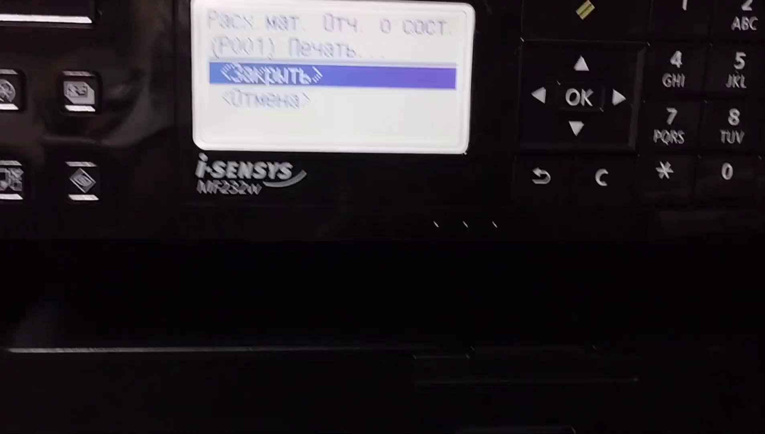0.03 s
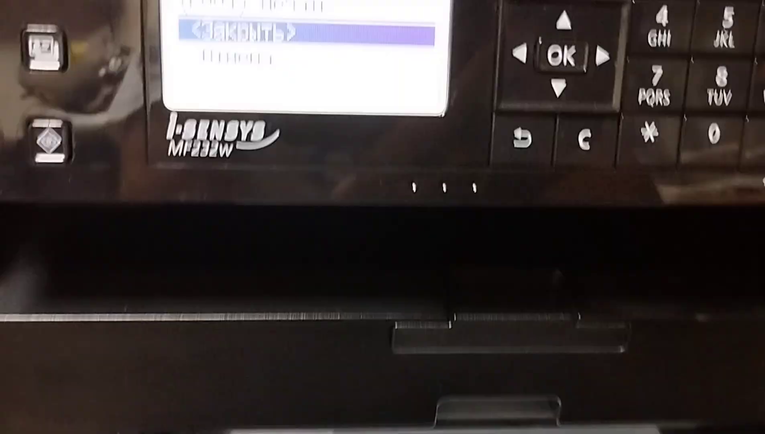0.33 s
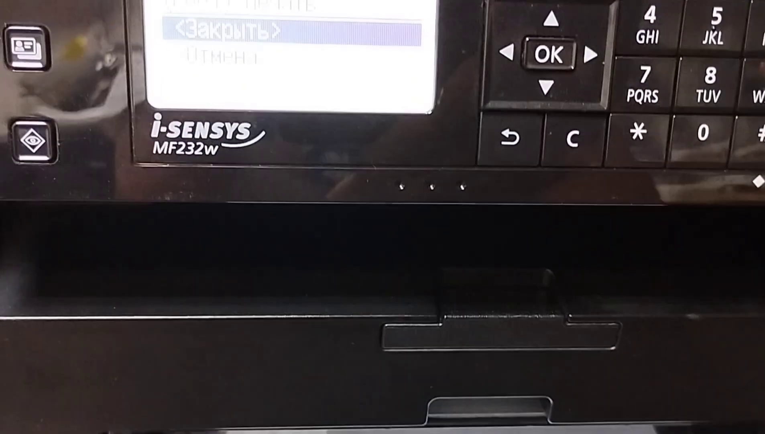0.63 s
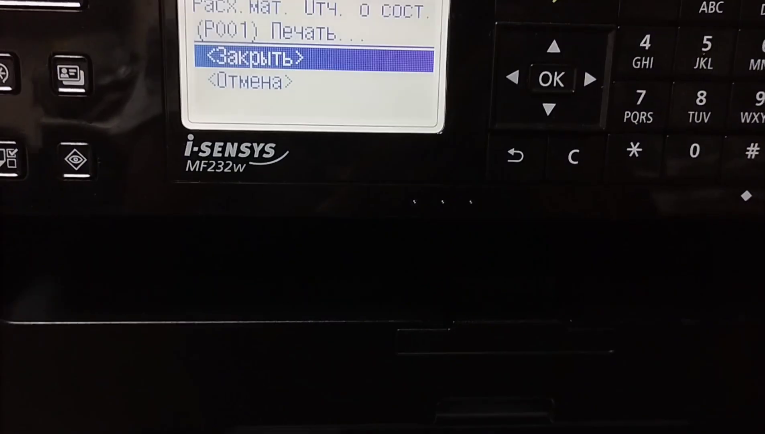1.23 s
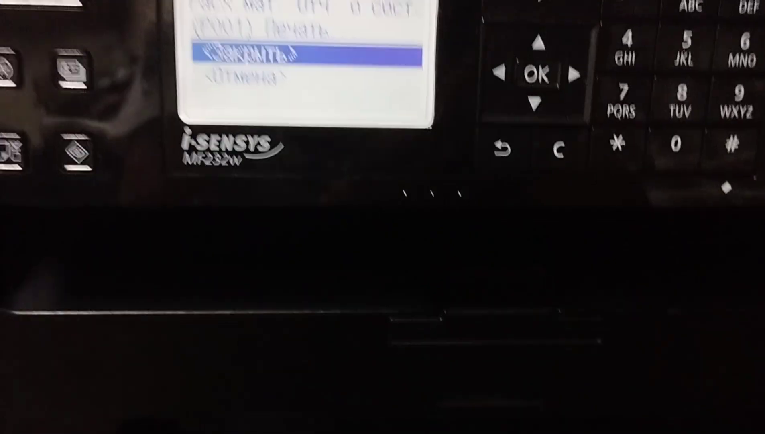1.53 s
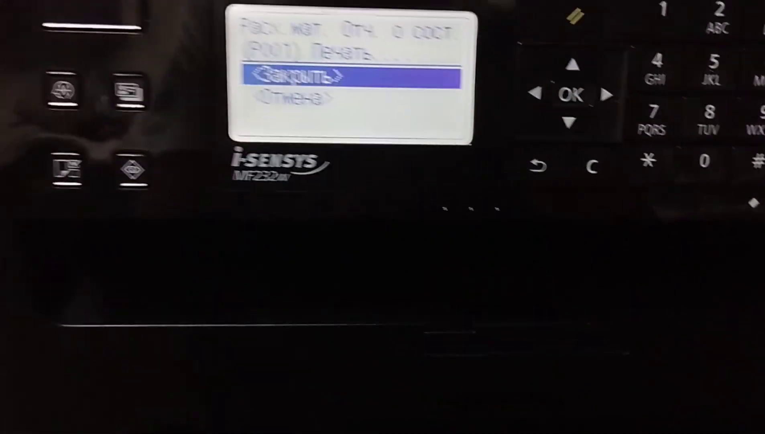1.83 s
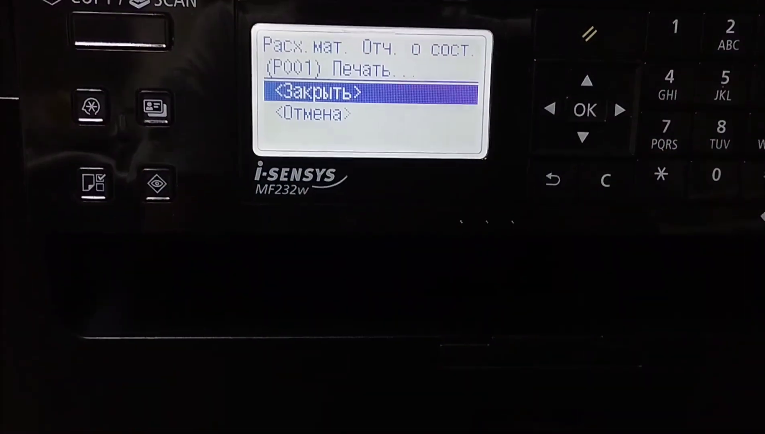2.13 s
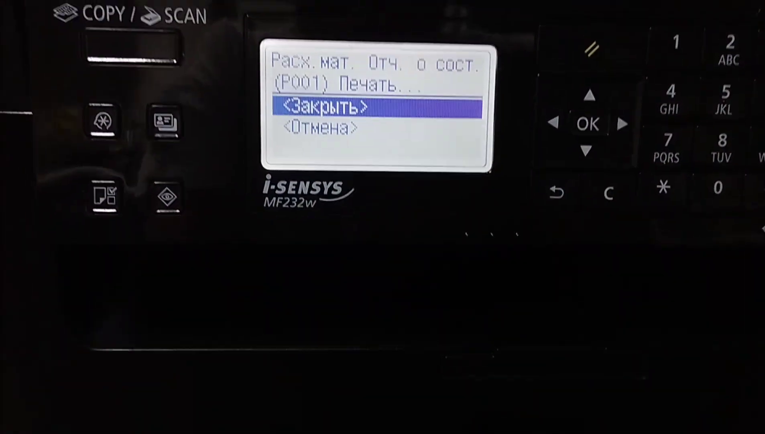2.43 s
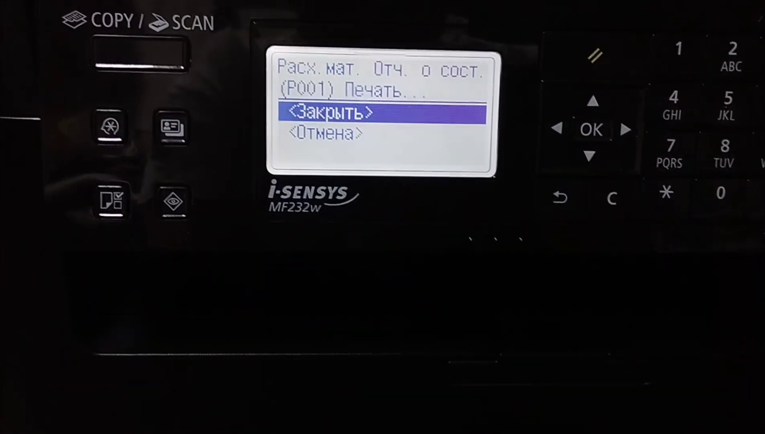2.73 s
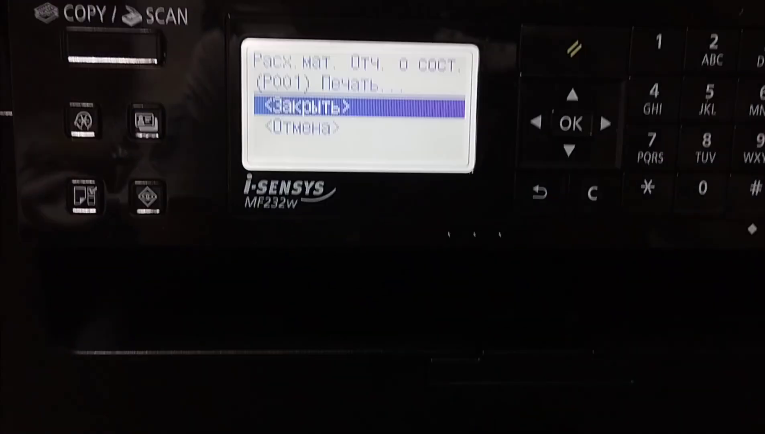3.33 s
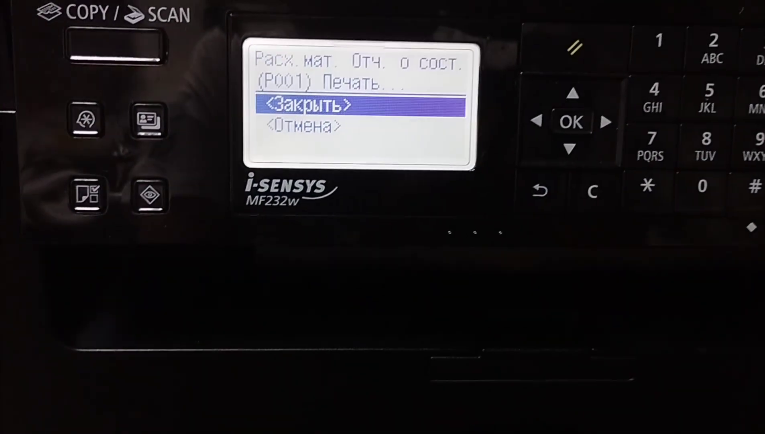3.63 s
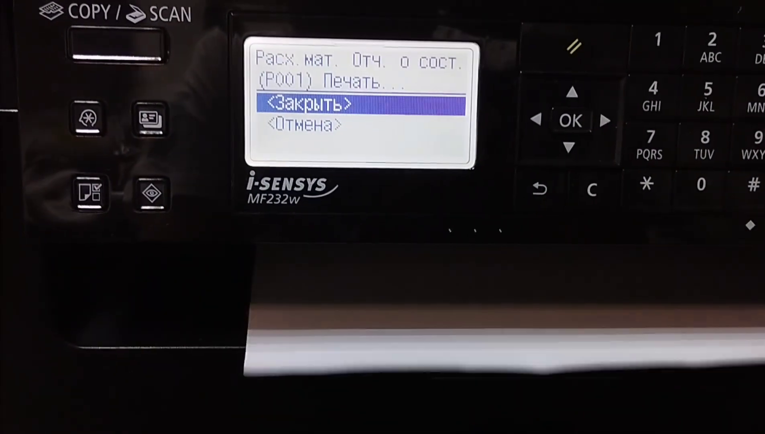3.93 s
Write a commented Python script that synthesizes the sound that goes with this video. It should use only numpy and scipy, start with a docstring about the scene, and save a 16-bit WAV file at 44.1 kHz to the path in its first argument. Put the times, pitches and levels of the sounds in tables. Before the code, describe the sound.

A laser printer runs close by with a rushing fan, whining gears and a low cabinet drone. About a second in, the pickup clunks several times, then a sheet hisses through with regular roller rubs and small clicks.

```python
"""Laser printer taking a sheet

At the desk, close up, on a stereo pair of microphones. The fan rushes and the gear train whines
steadily, while the drive sets the plastic cabinet booming. About a second in, the pickup mechanism
clunks and a sheet starts to slide through, hissing and snapping. The feed roller rubs once a turn
and small levers click and ring."""
import sys
import numpy as np
from scipy import signal
from scipy.fft import rfft, irfft, next_fast_len
from scipy.io import wavfile
from scipy.ndimage import uniform_filter1d, map_coordinates

SR = 44100
rng = np.random.default_rng(int(sys.argv[2]) if len(sys.argv) > 2 else 0)


def persist_wave(psi):
    """Save psi, clipped to +-1, as 16-bit WAV."""
    counts = np.round(np.clip(psi, -1, 1) * 32767).astype(np.int16)
    wavfile.write(sys.argv[1], SR, np.atleast_2d(counts).T)


N = 176400

SHAFT_HZ, MESH_HZ, ROTOR_HZ = 61.21, 306.05, 520.6
SPEED_WOBBLE, HUM_WOBBLE = 0.000615, 0.0033  # fractions of the speed
FEED_START_S, FEED_FULL_S = 0.92, 2.18
CLACK_T60_S, CRACK_T60_S, ROOM_T60_S, ATTACK_S = 0.041, 0.046, 0.27, 0.0014
NOTCH_HZ, NOTCH_WIDTH_HZ, NOTCH_DB, TOP_HZ = 8230, 606, -17, 15800

# Tone colours of the noises. Each row: frequency in Hz, relative level per Hz in dB.
FAN_COLOUR = [(18, -56), (30, 0.5), (38, -1), (69, -23.5), (120, -5.5), (156, -8), (213, -1), (307, -13),
              (332, -22.5), (443, -11), (575, -15), (639, -14), (1020, -29), (1870, -32.5), (3150, -25.5),
              (3680, -26.5), (4090, -23.5), (8280, -37.5), (15500, -34)]
BUZZ_COLOUR = [(1200, -19), (2600, -11), (4000, 0), (5800, -0.5), (7000, -3), (10000, -33), (14000, -8),
               (15500, -16)]
RATTLE_COLOUR = [(200, -51), (400, -23.5), (620, 4), (800, 3), (1150, 0.5), (1550, -9), (2100, -5),
                 (3000, -11), (6000, -14), (12000, -55)]
RUB_COLOUR = [(200, -37), (420, -11), (640, 8.5), (820, 5), (1150, 0.5), (1550, -6), (2050, -0.5),
              (2800, -13), (6000, -24), (12000, -57)]
CLACK_COLOUR = [(200, -36), (420, -3), (610, 7.5), (800, -2), (1100, 0.5), (1400, -6.5), (2300, -6),
                (3000, -13), (6000, -41)]
CRACK_COLOUR = [(800, 1), (2400, 3), (4000, 5), (6000, 2.5), (8000, -3.5), (11000, -17), (15500, -33)]
FRAME_COLOUR = [(25, -26), (55, -44), (80, -5.5), (130, -20), (180, -12.5), (400, -24), (2000, -82)]
SLIDE_COLOUR = [(300, 8), (1000, 5.5), (2500, 5), (5500, 4), (7200, 0.5), (11200, -5.5), (12600, 3.5),
                (15500, -2.5)]
BUCKLE_COLOUR = [(500, -29), (1500, -1), (3000, 1.5), (5500, -2), (8500, 1.5), (11000, -8.5), (13500, 1),
                 (15500, -4)]
EDGE_COLOUR = [(1000, -25), (2200, -10), (4800, -3), (7000, -10), (11000, -12), (13500, -5), (15500, 2.5)]
# Whine of the gear shaft, gear mesh and motor. Each row: multiple (sounded at the nearest whole
# one), level idling in dB, level feeding in dB, left minus right in dB.
SHAFT_PARTIALS = [(25, -68, -74, -3), (51, -61, -75, -6.5), (53, -68, -86, -16), (70.6, -67, -83, -2),
                  (82.2, -66, -76, 4), (87.8, -67.5, -76, 6), (102.4, -77, -72, -16)]
MESH_PARTIALS = [(1, -50.5, -51.5, 0.5), (9, -69.5, -62, 5.5), (11, -69, -59, -7), (13, -57.5, -58.5, -4.5),
                 (14, -64.5, -61.5, -8), (15, -67, -73, -14), (16, -69, -57.5, -6), (17, -73, -77, 13),
                 (18, -73, -70, 11)]
ROTOR_PARTIALS = [(2, -59.5, -58.5, 2.5), (4, -70, -63, -12), (5, -71, -65.5, -9)]
# Partials that sing up as the load shifts.
# Each row: multiple, middle in seconds, half width in seconds, boost in dB.
MESH_SWELLS = [(16, 3.4, 0.37, 4)]
ROTOR_SWELLS = [(5, 1.8, 0.29, 9.1)]
# Motor hums and fan tones. Each row: frequency in Hz, level idling in dB, level feeding in dB.
HUM_TONES = [(68.2, -73, -60), (71, -52, -52.5), (107.8, -53, -55.5), (136.6, -79, -51),
             (444.3, -53.5, -56.5), (547, -64, -59), (615, -62, -60.5), (13650, -75.5, -80)]
# Rise and fall of the cabinet's drone, the frame's rumble, the sheet's hiss and the motor's squeal.
# Each row: time in seconds, level in dB.
DRONE_LEVELS = [(0, -39.5), (.19, -37.5), (.42, -46.5), (.9, -46), (1.05, -39.5), (1.3, -40), (1.5, -43.5),
                (1.67, -37), (1.98, -38.5), (2.15, -40.5), (2.48, -45), (2.66, -37), (2.82, -44),
                (3.0, -35), (3.15, -49), (3.32, -37), (3.48, -48), (3.75, -35.5), (3.85, -48.5), (4, -36.5)]
FRAME_LEVELS = [(.93, -68), (.99, -49), (1.16, -33.5), (1.21, -51)]
SLIDE_LEVELS = [(.93, -93), (1.2, -46), (1.42, -47.5), (1.55, -52), (2.09, -54), (2.14, -48), (2.6, -46),
                (3.15, -48), (3.45, -49.5), (4, -50.5)]
SQUEAL_LEVELS = [(1.14, -72), (1.28, -61), (1.45, -54), (1.485, -55), (1.505, -75)]
# Cabinet resonances under the drive. Each row: frequency in Hz, width in Hz, relative level in dB.
DRONE_MODES = [(177, 12.5, -3.5), (228, 16.4, 3.5), (279, 91, -8)]
# Rubs of the feed roller. Each row: middle in seconds, level in dB, half width in seconds.
ROLLER_TURNS = [(1.86, -43.5, 0.074), (2.26, -42, 0.064), (2.615, -42.5, 0.066), (2.975, -42, 0.058),
                (3.33, -42, 0.056), (3.69, -42.5, 0.041)]
# Levers and springs. Each row: start in seconds, pitch in Hz, level in dB, t60 in seconds.
LEVER_PINGS = [(.111, 506, -29.5, 0.088), (0.454, 487, -40, 0.095), (.967, 2120, -33, .04),
               (.981, 2200, -20, 0.023), (.982, 2360, -33, 0.024), (1.088, 1454, -27, 0.083),
               (1.09, 5900, -28.5, 0.04), (0.941, 1110, -24, 0.056), (0.943, 236, -23.5, 0.093),
               (1.361, 566, -27.5, 0.12), (1.3599, 1010, -23.5, 0.042), (1.563, 930, -38, .05),
               (1.969, 2666, -36.5, 0.039), (1.604, 1022, -31.5, 0.11), (1.606, 620, -30, .09),
               (1.608, 2220, -26, 0.018), (2.586, 572, -24, 0.075), (2.586, 1200, -39, .05),
               (2.587, 1670, -40, .04), (3.168, 1550, -35, 0.027), (3.169, 2030, -33.5, 0.028),
               (3.229, 1020, -23, 0.029), (3.228, 2270, -21.5, 0.012), (3.231, 4720, -28, 0.018),
               (3.516, 4750, -36, .035), (3.527, 2190, -34, 0.032)]
# Clutch and lever knocks. Each row: start in seconds, then clack, thud and crack levels in dB.
BLOWS = [(0.113, -43.5, -51, -63), (.47, -41.5, -51, -51), (0.9401, -24, -23, -35),
         (0.966, -25.5, -24.5, -48), (.981, -25, -34, -43), (.992, -27.5, -22, -36),
         (1.006, -27.5, -22, -35.5), (1.046, -44, -24, -69), (1.081, -20, -19, -44),
         (1.089, -24.5, -25, -28.5), (1.11, -24.5, -30, -34.5), (1.123, -30, -32, -35),
         (1.216, -36, -40, -38.5), (1.36, -24.5, -17, -43), (1.374, -29, -18.5, -60),
         (1.388, -57, -27, -58), (1.42, -35.5, -29, -45), (1.5622, -31, -50, -36), (1.604, -27.5, -24, -33),
         (1.62, -25, -25.5, -54), (1.971, -38, -50, -41), (2.552, -32.5, -30.5, -50),
         (2.557, -32.5, -25, -50), (2.5839, -27.5, -41, -33.5), (2.6, -38, -31, -41),
         (2.725, -36, -37, -57), (3.168, -40, -39, -38), (3.2279, -31.5, -36, -34), (3.231, -35, -42, -50),
         (3.24, -36, -31.5, -54)]
# The struck cabinet. Each row: frequency in Hz, relative level in dB, t60 in seconds.
THUD_MODES = [(72.2, -17.5, 0.096), (127, -18.5, 0.56), (182, 1.5, 0.049), (215.4, -1.5, 0.27),
              (255.4, -4, 0.24), (277.5, -3.5, 0.11), (385, -18.5, 0.18), (511, -11, 0.086),
              (590, -10, 0.19)]
# Paper snaps. Each row: start in seconds, level in dB, t60 in seconds, tilt in dB per octave.
SHEET_SNAPS = [(0.986, -43, 0.14, 13), (1.067, -34, 0.13, -4.5), (1.081, -26, 0.11, -1.5),
               (1.089, -23, 0.054, -3), (1.147, -32, 0.081, -1.5), (3.521, -36, 0.07, -1)]
# Thin, hard ticks of the paper's edge. Each row: start in seconds, level in dB, t60 in seconds.
EDGE_TICKS = [(3.5143, -15.5, 0.015), (3.5195, -36, 0.034)]
# Levers hitting their stops. Each row: time in seconds, level in dB, centre frequency in Hz.
LEVER_STOPS = [(0.9416, -21, 1200), (1.3628, -18, 380), (1.3675, -16, 270), (2.5865, -16.5, 640),
               (3.2314, -23, 1100)]
# How alike the two microphones sound. Each row: frequency in Hz, left-right correlation.
MIC_CORRELATION = [(30, -0.66), (70, 0.72), (150, 1), (300, 0.96), (600, 0.88), (1100, 0.25), (2200, 0.062),
                   (4000, -0.079), (12000, -0.098)]
# Balance of the noises across the pair. Each row: frequency in Hz, left minus right in dB.
MIC_BALANCE = [(60, -2.5), (200, 0.5), (1000, 0.5), (2200, 0), (4000, -1.5), (6000, -5), (9000, 2.5),
               (13000, 10.5)]


def amp(db):
    """Decibels to gain."""
    return 10 ** (np.asarray(db) / 20)


def unit(x):
    """Scale to rms 1."""
    return x / np.sqrt(np.mean(x ** 2) + 1e-20)


def along(points, hz):
    """(Hz, value) points read on a log axis."""
    freqs, values = np.transpose(points)
    return np.interp(np.log(hz + 1), np.log(freqs + 1), values)


def clock():
    """Time of every sample in seconds."""
    return np.arange(N) / SR


def curve(rows, **ends):
    """(seconds, value) points joined by lines."""
    return np.interp(clock(), *np.transpose(rows), **ends)


def wobble(rate):
    """A smooth random curve, rate knots a second."""
    knots = rng.standard_normal(int(N * rate / SR) + 4)
    return map_coordinates(knots, [clock() * rate], mode="nearest")


def swell(s, half_width):
    """A smooth rise and fall around time s."""
    return np.exp(-.5 * ((clock() - s) / half_width) ** 2)


def dying(t, t60):
    """Envelope that falls 60 dB in t60 seconds."""
    return np.exp(-np.log(1000) * t / t60)


def add(out, s, sound):
    """Mix a sound in at time s."""
    start = round(s * SR)
    out[:, start:start + sound.shape[-1]] += sound[..., :N - start]


def filtered(x, response):
    """Filter x by a gain that depends on frequency."""
    size = x.shape[-1]
    padded = next_fast_len(size + 8192)
    return irfft(rfft(x, padded) * response(np.fft.rfftfreq(padded, 1 / SR)), padded)[..., :size]


def mic_angle(hz):
    """Half the phase angle between the microphones that gives their correlation."""
    return np.arccos(np.clip(along(MIC_CORRELATION, hz), -1, 1)) / 2


def spread(pair, colour):
    """Colour two unrelated signals and lay them across the pair: lows shared, treble wide. Rms 1."""
    def response(hz):
        angle = mic_angle(hz)
        return amp(along(colour, hz)) * np.array([np.cos(angle), np.sin(angle)])
    mid, side = filtered(pair, response)
    return unit(np.array([mid + side, mid - side]))


def burst(colour, t60, grain_db=0, room_db=-11):
    """A dense, quickly dying ring with the room's weak tail behind it."""
    t = np.arange(SR // 3) / SR
    shape = np.hypot(dying(t, t60), amp(room_db) * dying(t, ROOM_T60_S)) * (1 - np.exp(-t / ATTACK_S))
    roughness = unit(uniform_filter1d(rng.standard_normal(len(t)), size=30))
    grain = amp(grain_db * np.clip(roughness, -2, 2))
    return shape * spread(grain * rng.standard_normal((2, len(t))), colour)


def chatter(colour, per_s, scatter_db):
    """Dense ticks of a dozen small plastic parts. Rms 1."""
    ticks = (rng.random(N) < per_s / SR) * amp(scatter_db * np.clip(rng.standard_normal(N), -2, 2))
    t = np.arange(SR // 30) / SR
    rings = dying(t, .025) * rng.standard_normal((12, 2, len(t)))
    part = rng.integers(len(rings), size=N)
    struck = sum(signal.oaconvolve((ticks * (part == i))[None], ring, axes=1)[:, :N]
                 for i, ring in enumerate(rings))
    return spread(struck, colour)


def under_load(idle_db, feed_db):
    """A level that glides from idling to feeding as the drive takes up the sheet."""
    return curve([(FEED_START_S, idle_db), (FEED_FULL_S, feed_db)])


def fan():
    """The fan pushes out a steady rush of air."""
    return amp(-43.5 + 0.28 * wobble(12)) * spread(rng.standard_normal((2, N)), FAN_COLOUR)


def whine(hz, partials, swells=()):
    """A turning part sounds multiples of its rate; each flutters and shifts with the load."""
    phase = 2 * np.pi * hz * np.cumsum(1 + SPEED_WOBBLE * wobble(25.07)) / SR
    out = np.zeros((2, N))
    for multiple, idle_db, feed_db, pan_db in partials:
        harmonic = round(multiple)
        boost = sum(db * swell(s, width) for which, s, width, db in swells if which == harmonic)
        level = under_load(idle_db, feed_db) + boost + .9 * wobble(7.7)
        angle = mic_angle(multiple * hz)
        for mic, sign in enumerate((1, -1)):
            gain = amp(level + sign * pan_db / 2 + 1.46 * wobble(30.07))
            out[mic] += np.sqrt(2) * gain * np.sin(harmonic * phase + sign * angle)
    return out


def hums():
    """Motor hums and fan tones, dead centre, slightly unsteady, shifting with the load."""
    out = np.zeros(N)
    for hz, idle_db, feed_db in HUM_TONES:
        speed = 1 + HUM_WOBBLE * min(1, ROTOR_HZ / hz) * wobble(20)
        gain = amp(under_load(idle_db, feed_db) + 2.6 * wobble(8))
        out += gain * np.sin(2 * np.pi * hz * np.cumsum(speed) / SR)
    return np.sqrt(2) * out


def gear_buzz():
    """The same tooth flaws pass on every turn of the shaft: a fine comb of overtones."""
    flaws = rng.standard_normal((2, round(SR / SHAFT_HZ)))
    turns = np.cumsum(1 + SPEED_WOBBLE * wobble(25.17)) * SHAFT_HZ / SR
    place = turns % 1 * flaws.shape[1]
    passing = np.array([map_coordinates(side, [place], mode="grid-wrap") for side in flaws])
    return amp(-58.5) * spread(passing, BUZZ_COLOUR)


def cabinet_drone():
    """The drive shakes the cabinet's low resonances."""
    def panels(hz):
        modes = sum(amp(db) * 1j * hz * width / (centre ** 2 - hz ** 2 + 1j * hz * width)
                    for centre, width, db in DRONE_MODES)
        return modes / (1 + (hz / 330) ** 4)
    ring = unit(filtered(rng.standard_normal(N), panels))
    power = np.abs(uniform_filter1d(ring ** 2, size=3000))
    evened = unit(ring / np.sqrt(power + 0.12))
    return amp(curve(DRONE_LEVELS) - 1) * evened


def rollers():
    """Loose gear teeth tick densely; once the sheet is in, the feed roller swishes once a turn."""
    idling = clock() < FEED_START_S
    rattle = amp(-49.5 - 2.5 * idling) * chatter(RATTLE_COLOUR, per_s=900, scatter_db=2.5)
    rubs = sum(amp(db) * swell(s, width) for s, db, width in ROLLER_TURNS)
    return rattle + rubs * chatter(RUB_COLOUR, per_s=1100, scatter_db=4)


def pings():
    """Struck levers and springs ring briefly at their own pitch."""
    out, t = np.zeros((2, N)), np.arange(SR // 4) / SR
    for s, hz, db, t60 in LEVER_PINGS:
        shape = dying(t, t60) * (1 - np.exp(-t / ATTACK_S))
        mic_phases = rng.normal(0, 0.64, (2, 1))
        add(out, s, amp(db) * shape * np.sin(2 * np.pi * hz * t + mic_phases))
    return out


def knocks():
    """Each blow of the clutch or a lever cracks, clacks and rings the cabinet."""
    out, t = np.zeros((2, N)), np.arange(SR // 2) / SR
    for s, clack_db, thud_db, crack_db in BLOWS:
        thud = np.zeros(len(t))
        for hz, db, t60 in THUD_MODES:
            shape = amp(db + rng.normal(0, 1.14)) * dying(t, t60)
            detuned_hz = hz * rng.normal(1, 0.02)
            thud += shape * np.sin(2 * np.pi * detuned_hz * t + rng.uniform(0, 2 * np.pi))
        add(out, s, amp(thud_db - 6) * thud * (1 - np.exp(-t / 0.0042)))
        add(out, s, amp(clack_db) * burst(CLACK_COLOUR, CLACK_T60_S))
        add(out, s, amp(crack_db) * burst(CRACK_COLOUR, CRACK_T60_S))
    return out


def frame_shudder():
    """The frame shakes during the pickup, then rumbles on more quietly."""
    return amp(curve(FRAME_LEVELS)) * spread(rng.standard_normal((2, N)), FRAME_COLOUR)


def paper():
    """The sheet hisses along its guides, snaps as it buckles and springs free, and its edge ticks."""
    hiss_gain = amp(curve(SLIDE_LEVELS) + 2.2 * wobble(35.6))
    out = hiss_gain * spread(rng.standard_normal((2, N)), SLIDE_COLOUR)
    for s, db, t60, tilt in SHEET_SNAPS:
        colour = [(hz, level + tilt * np.log2(hz)) for hz, level in BUCKLE_COLOUR]
        add(out, s, amp(db) * burst(colour, t60, grain_db=1, room_db=-16.5))
    for s, db, t60 in EDGE_TICKS:
        add(out, s, amp(db) * burst(EDGE_COLOUR, t60, grain_db=1, room_db=-33))
    return out


def lever_stops():
    """A lever hits its stop: one hard cycle of pressure, then a weak clatter of the cabinet."""
    out, t = np.zeros((2, N)), np.arange(SR // 50) / SR
    for s, db, hz in LEVER_STOPS:
        phase = np.pi * (hz * t - 1)
        push = (2 * phase ** 2 - 1) * np.exp(-phase ** 2)
        add(out, s - 1 / hz, amp(db) * push)  # the push peaks at time s
        add(out, s, amp(db - 18.5) * burst(CLACK_COLOUR, CLACK_T60_S))
    return out


def motor_squeal():
    """The motor's tenth multiple swells to a whistle under the pickup load and stops short."""
    level = curve(SQUEAL_LEVELS, left=-120, right=-120)
    phase = 2 * np.pi * 10 * ROTOR_HZ * np.cumsum(1 + SPEED_WOBBLE * wobble(41)) / SR
    return np.sqrt(2) * amp(level) * np.sin(phase + np.array([[.5], [-.5]]))


def scene():
    """The whole printer from close by; the bands of its noises reach the two microphones unequally."""
    noises = fan() + rollers() + paper() + knocks() + lever_stops() + pings() + frame_shudder()
    placed = filtered(noises, lambda hz: amp(along(MIC_BALANCE, hz) * np.array([[.5], [-.5]])))
    drive = cabinet_drone() + gear_buzz() + whine(SHAFT_HZ, SHAFT_PARTIALS) + hums() + motor_squeal()
    gear_whine = whine(MESH_HZ, MESH_PARTIALS, MESH_SWELLS)
    motor_whine = whine(ROTOR_HZ, ROTOR_PARTIALS, ROTOR_SWELLS)
    return placed + drive + gear_whine + motor_whine


def record(dry):
    """The microphones have a treble notch and a band limit."""
    def response(hz):
        notch = amp(NOTCH_DB * np.exp(-((hz - NOTCH_HZ) / NOTCH_WIDTH_HZ) ** 2))
        return notch * (hz < TOP_HZ)
    return filtered(dry, response)


dry = scene()
out = record(dry)
persist_wave(out)
```